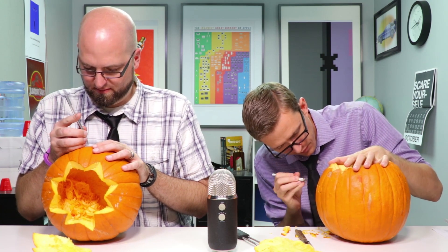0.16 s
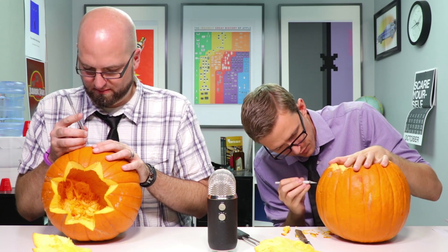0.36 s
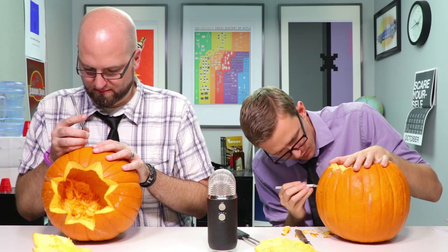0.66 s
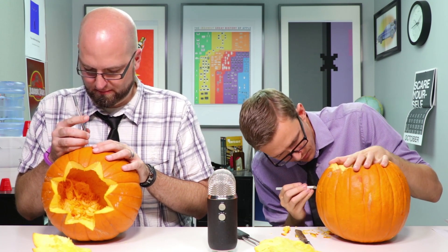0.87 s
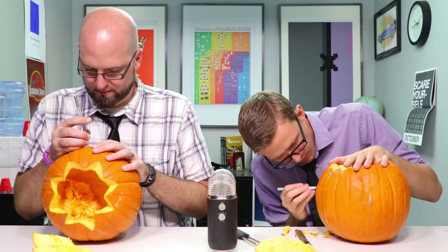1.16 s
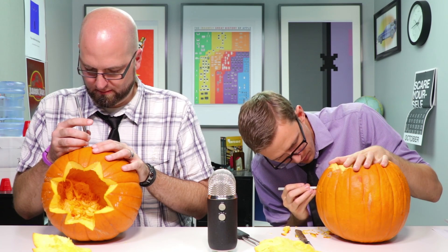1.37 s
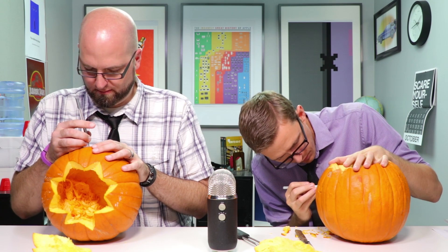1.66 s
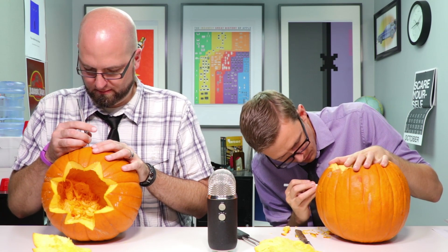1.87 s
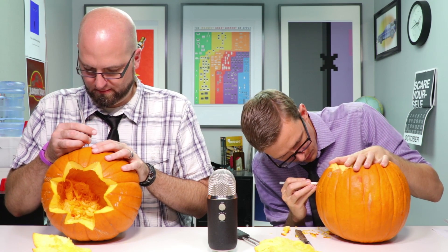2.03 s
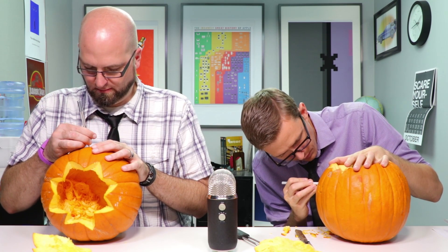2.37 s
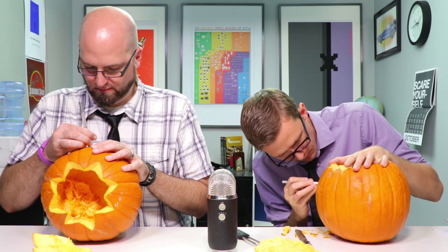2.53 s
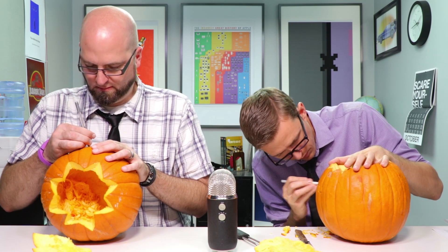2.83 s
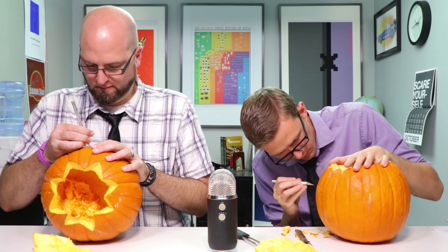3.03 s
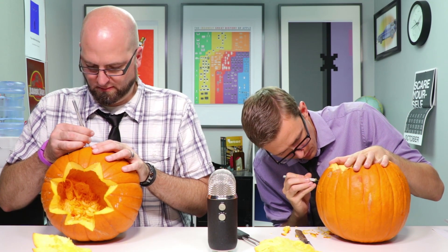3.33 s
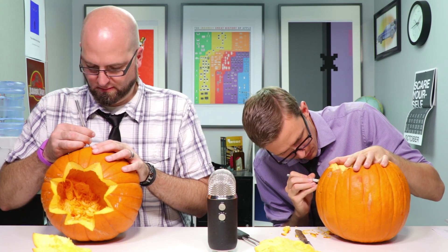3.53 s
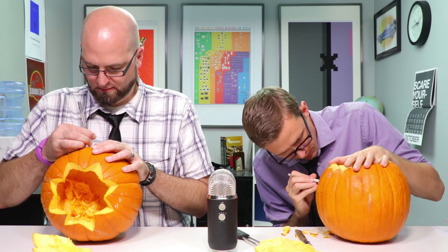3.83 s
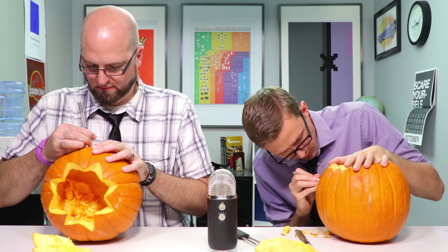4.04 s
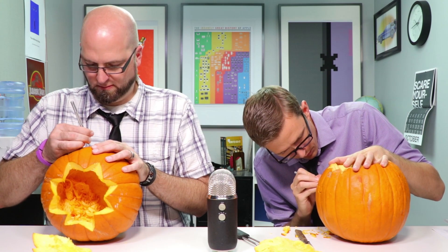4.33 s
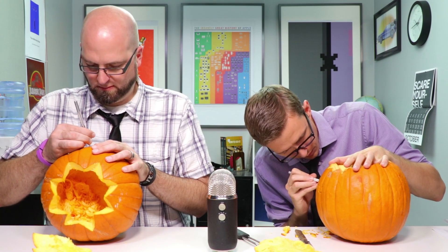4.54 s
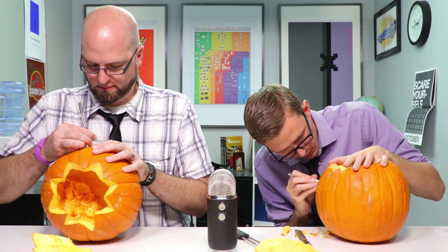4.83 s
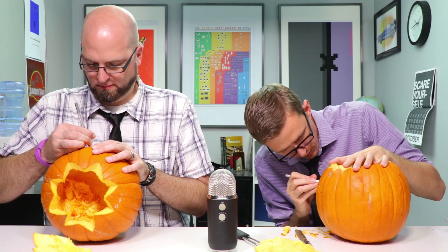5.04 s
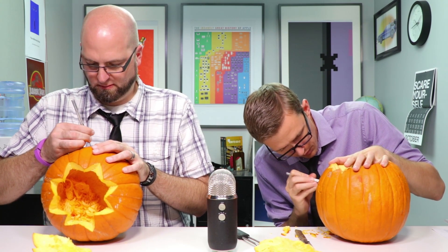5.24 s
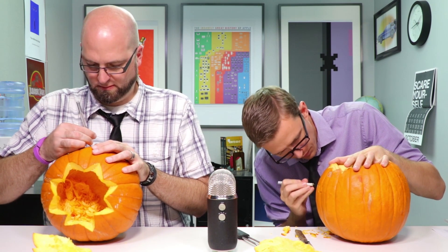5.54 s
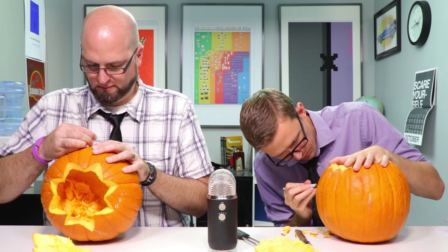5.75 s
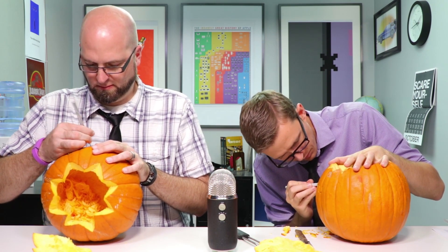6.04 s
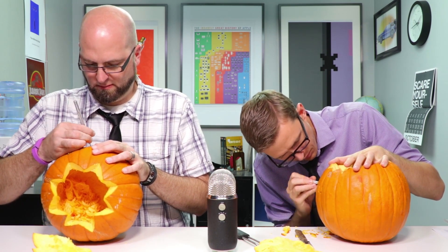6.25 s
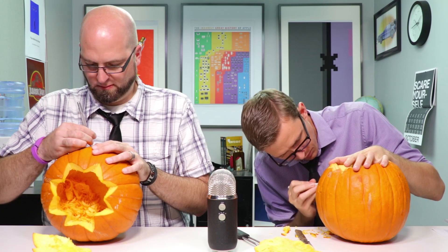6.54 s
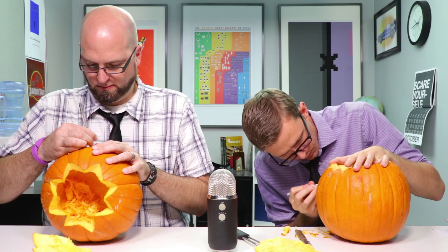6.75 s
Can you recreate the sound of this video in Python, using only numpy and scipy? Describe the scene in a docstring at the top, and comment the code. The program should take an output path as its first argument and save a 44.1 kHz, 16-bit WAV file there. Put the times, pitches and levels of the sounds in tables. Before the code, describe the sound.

Close on a table microphone, a blade scrapes and ticks through hollow pumpkin rind, with dull knocks, soft table bumps and a low room hum.

```python
"""Hollow pumpkins are carved on a table, close to a microphone standing on it, for about seven seconds.
From the start a small furnished room hums and hisses, and hands and blade excite the shell's modes.
From 0.17 s on, pushes jolt the table and the stand. A stiff tool snaps at 0.2 s, as a decaying crack
over ringing modes, then more softly at 1.3, 3.0 and 5.4 s. From about 1 s, torn fibres ring the shell,
rasp and hiss, with a soft breath-like rub at 3.34 s, among knocks (heaviest at 4.05 s) and ticks."""
import sys
import numpy as np
from scipy import signal
from scipy.fft import rfft, irfft
from scipy.io import wavfile
from scipy.ndimage import uniform_filter1d

SR = 44100
rng = np.random.default_rng(int(sys.argv[2]) if len(sys.argv) > 2 else 0)


def waveform_to_disk(signal):
    """Save audio, clipped to [-1, 1], as 16-bit WAV at the path in sys.argv[1]."""
    frames = np.transpose(np.atleast_2d(signal))
    scaled = np.clip(frames, -1, 1) * 32767
    samples = np.round(scaled).astype(np.int16)
    wavfile.write(sys.argv[1], SR, samples)


N = 303764  # samples

# blade strokes through rind, and at 3.34 s a soft long breath-like rub: (time [s],
# nominal length [ms], lower shell modes [dB], upper shell modes [dB], blade hiss [dB])
STROKE_LEVELS = [(0, 46, -97, -76.5, -80), (0.117, 26, -85, -67, -80.5), (0.953, 34, -64, -86, -88),
                 (1.3, 16, -63, -87, -88), (1.405, 13, -55, -76, -82), (1.46, 178, -70, -70.5, -84.5),
                 (1.559, 132, -60, -68.5, -79), (1.74, 55, -72, -73, -80.5), (1.843, 30, -63, -68.5, -85),
                 (2.008, 32, -64, -75.5, -83), (2.292, 48, -55.5, -63, -76), (2.438, 17, -61.5, -65.5, -86),
                 (2.679, 20, -63.5, -71.5, -86), (2.807, 43, -57.5, -57, -71), (2.914, 16, -57.5, -71, -94),
                 (3.151, 26, -81, -83, -80.5), (3.228, 16, -65, -80, -94), (3.34, 220, -85, -78, -93),
                 (3.739, 31, -65, -78, -78), (3.85, 25, -66, -65, -78), (3.908, 21, -61, -77, -84),
                 (4.036, 27.6, -50, -74, -79), (4.17, 115, -62, -76, -77.5), (4.293, 39, -59, -72.5, -75),
                 (4.376, 31, -68, -74, -81.5), (4.644, 58, -60.5, -71, -80.5), (4.773, 42, -62, -67, -78),
                 (4.821, 19, -76, -62.5, -78), (4.896, 16.4, -52.5, -71, -76),
                 (4.944, 9.7, -62, -59.5, -89), (5.086, 38, -60.5, -68, -83), (5.216, 38, -70, -74, -74.5),
                 (5.262, 6.7, -68, -62.5, -80), (5.394, 52, -71, -73, -81),
                 (5.521, 26, -58.5, -75.5, -78.5), (5.717, 20, -55, -68.5, -80),
                 (5.895, 27.6, -59, -68.5, -77.5), (6.169, 64, -73, -82, -79), (6.361, 32, -58.5, -72, -82),
                 (6.425, 123, -59.5, -65, -75.5), (6.671, 39, -60.5, -78.5, -83),
                 (6.82, 23, -53.5, -66.5, -75.5)]
# hands rubbing and working the shells, joined by straight lines: (time [s], level [dB])
HAND_LEVELS = [(0.0, -73), (0.19, -61.5), (0.38, -76), (1.2, -79), (1.549, -64.5), (1.9, -73), (2.6, -79),
               (3.0, -67), (3.25, -75), (3.45, -72.5), (3.9, -72), (4.24, -61.5), (4.4, -84), (4.8, -68),
               (5.001, -100), (5.5, -61.5), (5.6, -75), (6.89, -79)]
# blows of blade or finger on a shell: (time [s], blow level [dB], favoured mode frequency [Hz])
SHELL_KNOCKS = [(0.198, -47.5, 294), (0.393, -59.5, 382), (0.819, -63, 398), (1.412, -63, 170),
                (1.857, -45, 170), (2.02, -60, 183), (2.321, -47, 464), (2.445, -47.5, 268),
                (2.578, -56.5, 301), (2.687, -54, 186), (2.82, -42, 216), (2.919, -47.5, 215),
                (3.11, -54, 167), (3.23, -61.5, 375), (3.723, -55, 380), (3.757, -49.5, 384),
                (3.856, -54.5, 400), (4.051, -36, 135), (4.66, -52, 171), (4.783, -55.5, 387),
                (4.907, -49.5, 447), (4.951, -47, 302), (5.064, -49.5, 224), (5.223, -56, 370),
                (5.266, -54.5, 370), (5.438, -48, 218), (5.688, -56.5, 214), (5.903, -49.5, 486),
                (6.171, -56, 420), (6.221, -51, 169), (6.366, -62, 443), (6.435, -49.5, 243),
                (6.608, -59.5, 435), (6.691, -63, 173), (6.828, -47, 172)]
# blade catching in the rind: (time [s], level before decay [dB], pitch [Hz])
CATCHES = [(1.407, -79, 3080), (1.474, -71, 8500), (2.02, -75, 3200), (2.327, -66, 3320),
           (2.446, -62.5, 1490), (2.688, -73.5, 2770), (2.815, -72, 3020), (2.832, -68, 3560),
           (2.844, -70, 1780), (2.921, -74, 1880), (3.855, -67, 3020), (4.044, -67.5, 2970),
           (4.174, -68, 10500), (4.3, -70, 2980), (4.661, -74, 1500), (4.895, -70, 2960),
           (4.951, -64, 1600), (5.222, -63.5, 2580), (5.266, -64.5, 2950), (5.399, -65.5, 9300),
           (5.694, -66, 1200), (5.729, -64, 2660), (5.899, -69.5, 3020), (6.172, -69, 2900),
           (6.613, -79, 1500), (6.832, -62.5, 2950)]
# snaps of the stiff tool: (time [s], strike level [dB], low modes' strike against it [dB])
TOOL_SNAPS = [(0.2019, -33.5, -17), (1.306, -68, -22), (3.017, -44.5, -18), (5.438, -43.5, -15.5)]
# single pushes on the table, before the stand's response: (time of peak [s], depth [dB])
TABLE_JOLTS = [(0.165, -41.5), (0.234, -33.5), (0.327, -35), (0.552, -32.5), (1.184, -42.5), (1.34, -36),
               (1.6, -38), (1.826, -35), (1.875, -40.5), (2.024, -32.5), (2.402, -40.5), (2.46, -31.5),
               (2.589, -33), (3.026, -38), (3.204, -32), (3.273, -30.5), (3.332, -36), (3.69, -32),
               (3.842, -36.5), (4.074, -33), (4.104, -34.5), (4.288, -31.5), (4.395, -36), (4.639, -30.5),
               (4.855, -34), (4.935, -33), (4.987, -33.5), (5.085, -34), (5.124, -31.5), (5.16, -32.5),
               (5.267, -33.5), (5.303, -37), (5.431, -40.5), (5.53, -32.5), (5.568, -34.5), (5.685, -35),
               (5.989, -30.5), (6.202, -32.5), (6.227, -33.5), (6.303, -32.5), (6.596, -35), (6.704, -32.5),
               (6.882, -32.5)]
# sawing bouts with runs of quick pushes: (start time [s], end time [s], middle depth [dB])
SAWING_BOUTS = [(0.253, .36, -40), (2.349, 2.44, -36), (2.709, 2.89, -40), (2.978, 3.19, -40.5),
                (3.857, 3.9, -35), (4.036, 4.16, -37), (4.313, 4.37, -37), (4.405, 4.46, -35.5),
                (4.672, 4.97, -44), (5.226, 5.65, -38), (5.893, 5.98, -37.5), (6.238, 6.38, -36),
                (6.824, 6.87, -33.5)]
# modes of the hollow shell when no hand damps it: (frequency [Hz], gain [dB], t60 [s])
SHELL_MODES = [(97.3, -3, 0.16), (184.4, 0.5, 0.052), (288, -4, 0.097), (372.6, -2, 0.078), (442, 0, 0.055),
               (542.6, -0.5, 0.051), (753, -5.5, 0.029), (902.5, -12, 0.055), (958.5, -15, 0.083),
               (1160, -14.5, 0.034), (1423, -17.5, 0.017), (1700, -31.5, 0.037)]
# resonances of rasping rind, for one of two passes: (frequency [Hz], width [Hz], gain [dB])
RASP_PEAKS = [(1930, 860, -4), (2400, 2800, -12.5), (3050, 1020, -3)]
# resonances of the hissing blade, for one of two passes: (frequency [Hz], width [Hz], gain [dB])
BLADE_PEAKS = [(6170, 550, -4.5), (7430, 3000, 1), (9320, 3300, 0.1), (10880, 1500, 1), (13900, 3900, 3.5)]
# the blade's brightest ring, moving as it bends and sinks: (time [s], frequency [Hz])
BLADE_FOCUS_PATH = [(0, 10500), (1.45, 8500), (1.68, 8350), (1.8, 10400), (2.83, 9500), (4.2, 10000),
                    (5.0, 7550), (5.4, 9500), (6.5, 10640), (6.85, 7500)]
# modes of the snapping tool: (frequency [Hz], gain [dB], t60 [s])
TOOL_MODES = [(5200, -7, .007), (5600, 0, .008), (6100, -4, .007), (6960, -5, .017), (8200, -18, .005),
              (10800, -17, .01), (12200, -20, .006), (14700, -13, .008), (15200, -12, .012),
              (3900, -16, .006)]
# lower modes of its handle: (frequency [Hz], gain [dB], t60 [s])
HANDLE_MODES = [(1516, 3, 0.014), (1475, -9, 0.03), (1656, -2.5, 0.0057), (2340, -5.5, .045),
                (2464, -5.5, 0.022), (3020, -15.5, 0.0087), (1037, -14.5, 0.03)]
# appliance hum: (frequency [Hz], rms frequency wander [Hz], middle rms level [dB])
HUM_TONES = [(51.7, 2, -63), (119, 3, -70.5), (184.4, 7.5, -79), (398, 8.1, -86.5)]
# air and microphone hiss spectrum, relative to AIR_TOP_DB: (frequency [Hz], density [dB per Hz])
AIR_SPECTRUM = [(8.8, -26), (15, 0), (31, -10), (66, -20.5), (91, -14), (129, -14), (237, -39.5),
                (536, -38), (878, -44), (1240, -41.5), (1570, -45), (5810, -45), (10400, -44), (15600, -45)]

FIBRE_SPREAD_DB = 1.36  # mean of the random extra level of a torn fibre
RASP_DB, RASP_DB_PER_S = 2.5, -36  # rasp against hiss: long strokes glide and so rasp less
HANDS_UPPER_DB = -10  # drive of the upper shell modes by the hands
SKIN_HZ, SKIN_WIDTH_HZ, SKIN_DB = 1695, 1500, -18.5  # palms rustle on the rind; width of one pass
CONTACT_S = 0.0012  # how long a knock presses on the shell
CRACK_DB = -13  # crack against the tool's strike
SNAP_ECHO_S, SNAP_ECHO_DB = 0.0035, -27
SNAP_ROOM_DB = -2  # the tool snaps near the microphone, so less of it comes via the walls
JOLT_MS, BOUT_MS = 12.54, 9.05  # widths of the pushes at half depth
BOUT_GAP_S, BOUT_SPREAD_DB = 0.035, 2.5  # median gap and depth spread of the pushes in a bout
SWAY_HZ, SWAY_Q, SWAY_DB = 6.83, 2.58, -55.5  # stand resonance; rms level of its constant sway
ROOM_T60_S, ROOM_TREBLE_T60_S, ROOM_DB = 0.26, 0.15, -8.5
AIR_TOP_DB = -79.5  # density at 0 dB in the air spectrum [dB per Hz]
TOP_HZ = 15750  # recorder's upper limit


def undb(db):
    """Logarithmic level: decibels to amplitude gain."""
    return 10 ** (np.asarray(db) / 20)


def unit(x):
    """Normalisation: scale to rms 1."""
    return x / np.sqrt(np.mean(x ** 2))


def ring(x, modes):
    """Modal superposition: x strikes damped two-pole resonators of alternating sign."""
    out = 0
    for k, (hz, db, t60) in enumerate(modes):
        radius = np.exp(-np.log(1000) / (t60 * SR))
        w = 2 * np.pi * hz / SR
        gain = (-1) ** k * undb(db) * np.sin(w)
        out = out + signal.lfilter([gain], [1, -2 * radius * np.cos(w), radius ** 2], x)
    return out


def bands(x, peaks):
    """Broad resonance: parallel band-pass peaks, each with a centre, a width and a gain."""
    return sum(undb(db) * signal.lfilter(*signal.iirpeak(hz, hz / width, fs=SR), x)
               for hz, width, db in peaks)


def bands_twice(x, peaks):
    """Cascaded resonance: a second pass steepens the skirts and repeats the gains."""
    return bands(bands(x, peaks), peaks)


def add(track, s, piece):
    """Linear superposition: mix a piece into a track at s seconds."""
    i = max(int(s * SR), 0)
    track[i:i + len(piece)] += piece[:N - i]


def walk(rate):
    """Slow fluctuation: random values of about unit rms, held 1 / rate s and smoothed twice."""
    k = int(SR / rate)
    held = np.repeat(rng.standard_normal(N // k + 1), k)
    return 1.38 * uniform_filter1d(uniform_filter1d(held, k), k)[:N]


def fibres(rate):
    """Random impulse process: fibres tear as tiny clicks, rate per second, some larger than others."""
    torn = rng.random(N) < rate / SR
    return torn * rng.standard_normal(N) * undb(FIBRE_SPREAD_DB * rng.exponential(size=N))


def strokes():
    """Forced resonance: fine random clicks and rubbing hands drive the shell, rind, palms and blade."""
    low_force, upper_force, rasp_force, hiss_force = force = np.zeros((4, N))
    for s, ms, low_db, upper_db, hiss_db in STROKE_LEVELS:
        # the tapered stroke outlasts its nominal length and starts a little early
        shape = signal.windows.tukey(int(1.444 * ms * SR / 1000), .8)
        rasp_db = hiss_db + RASP_DB + RASP_DB_PER_S * ms / 1000
        for track, db in zip(force, (low_db, upper_db, rasp_db, hiss_db)):
            add(track, s - ms / 4000, undb(db) * shape)
    force *= undb(1.9 * walk(70))  # the blade sticks and slips
    hand_db = np.interp(np.arange(N) / SR, *np.transpose(HAND_LEVELS))
    hands = undb(hand_db) * rng.standard_normal(N)
    tear = unit(fibres(1200))

    # a hand on the shell damps the modes under a stroke
    damped = [(hz, db, 0.6 * t60) for hz, db, t60 in SHELL_MODES]
    low_modes, upper_modes = damped[:6], damped[6:]
    low_drive = low_force * tear + hands
    upper_drive = upper_force * tear + undb(HANDS_UPPER_DB) * hands
    # each group is scaled by its response to steady tearing
    shell = ring(low_drive, low_modes) / np.std(ring(tear, low_modes))
    shell = shell + ring(upper_drive, upper_modes) / np.std(ring(tear, upper_modes))

    rasp = unit(bands_twice(fibres(3500), RASP_PEAKS))
    skin = [(SKIN_HZ, SKIN_WIDTH_HZ, 0)]
    rustle = undb(SKIN_DB) * bands_twice(hands, skin) / np.std(bands_twice(tear, skin))
    return shell + rustle + rasp_force * rasp + hiss_force * blade_hiss()


def blade_hiss():
    """Filtered impulse noise: fine tearing in broad blade resonances, weighted by a moving focus."""
    fine = fibres(8000)
    focus = np.interp(np.arange(N) / SR, *np.transpose(BLADE_FOCUS_PATH))
    hiss = 0
    for peak in BLADE_PEAKS:
        octaves_off = np.log2(peak[0] / focus)
        hiss = hiss + undb(-35 * octaves_off ** 2) * bands_twice(fine, [peak])
    return unit(hiss)


def ticks():
    """Transient narrow-band noise: a few rough, decaying cycles where the blade catches."""
    out, t = np.zeros(N), np.arange(500) / SR
    envelope = np.exp(-t / 0.0051) * np.clip(t / .0004, 0, 1)
    for (s, db, hz), grit in zip(CATCHES, rng.standard_normal((len(CATCHES), 500))):
        catch = [(hz, 0.6 * hz, 0)]
        add(out, s, undb(db) * unit(bands_twice(grit, catch)) * envelope)
    return out


def knocks():
    """Impact excitation: a short push rings the shell; the struck spot favours some modes."""
    out = np.zeros(N)
    blow = np.hanning(int(SR * CONTACT_S) + 3)
    blow = np.pad(blow / blow.sum(), (0, 8000))  # time to ring
    for s, db, top_hz in SHELL_KNOCKS:
        spot = [(hz, mode_db - 7 * np.log2(hz / top_hz) ** 2, t60) for hz, mode_db, t60 in SHELL_MODES]
        add(out, s, undb(db) * ring(blow, spot))
    return out


def snaps():
    """Impulse response: a crack rings tool and rattling handle; the table reflects a faint echo."""
    strike, handle, crack = np.zeros((3, N))
    t = np.arange(600) / SR
    for (s, db, low_db), grit in zip(TOOL_SNAPS, rng.standard_normal((len(TOOL_SNAPS), 600))):
        add(strike, s, undb([db]))
        add(handle, s, undb([db + low_db]))
        add(handle, s, undb(db + low_db - 16) * grit * np.exp(-t / 0.01))  # rattle
        add(crack, s, undb(db + CRACK_DB) * grit * np.exp(-t / 0.0021))
    snap = 1.15 * ring(strike, TOOL_MODES) + ring(handle, HANDLE_MODES) + crack
    return snap + undb(SNAP_ECHO_DB) * np.roll(snap, int(SNAP_ECHO_S * SR))


def table():
    """Damped oscillator: pushes dent the pressure at the microphone; the stand swings back slowly."""
    sway = undb(SWAY_DB) * unit(bands(rng.standard_normal(N), [(SWAY_HZ, 3., 0)]))
    pushes = [(s, db, JOLT_MS) for s, db in TABLE_JOLTS]
    chances = rng.standard_normal((len(SAWING_BOUTS), 2, 30))
    for (start, end, db), (gap_chance, depth_chance) in zip(SAWING_BOUTS, chances):
        gaps = BOUT_GAP_S * np.exp(.3 * gap_chance)
        times = start + np.cumsum(gaps) - BOUT_GAP_S / 2
        pushes += [(s, db + BOUT_SPREAD_DB * c, BOUT_MS) for s, c in zip(times, depth_chance) if s < end]
    push = np.zeros(N)
    for s, db, ms in pushes:
        t = np.arange(-1.5 * ms, 1.5 * ms, 1000 / SR)  # ms from the peak
        dent = np.exp(-4 * np.log(2) * (t / ms) ** 2)
        add(push, s - 1.5 * ms / 1000, -undb(db) * dent)
    # resonant second-order high-pass
    w = 2 * np.pi * SWAY_HZ
    stand = signal.bilinear([1, 0, 0], [1, w / SWAY_Q, w ** 2], SR)
    return sway + signal.lfilter(*stand, push)


def room(x, near):
    """Reverberation: direct sound, then a dense tail; soft furnishings absorb the treble first."""
    t = np.arange(int(.4 * SR)) / SR
    noise = rng.standard_normal(len(t))
    low = signal.lfilter(*signal.butter(2, 3500, fs=SR), noise)
    tail = low * undb(-60 * t / ROOM_T60_S) + (noise - low) * undb(-60 * t / ROOM_TREBLE_T60_S)
    tail *= np.clip(t / 0.0069 - .4, 0, 1)  # the first walls answer after a few ms
    tail /= np.sqrt(np.sum(tail ** 2))
    sent = x + undb(SNAP_ROOM_DB) * near
    return x + near + undb(ROOM_DB) * signal.fftconvolve(sent, tail)[:N]


def background():
    """Stationary noise and modulated tones: steady air and microphone hiss under wavering hum."""
    hz, db = np.transpose(AIR_SPECTRUM)
    f = np.maximum(np.arange(N // 2 + 1) * SR / N, 1)
    white = np.sqrt(SR / 2) * rng.standard_normal(N)  # 0 dB per Hz
    air_db = AIR_TOP_DB + np.interp(np.log(f), np.log(hz), db)
    air = irfft(rfft(white) * undb(air_db), N)
    t = np.arange(N) / SR
    hum = 0
    for hz, width, db in HUM_TONES:
        level = undb(db + walk(6.5))
        cycles = hz * t + np.cumsum(width * walk(9)) / SR
        hum = hum + level * np.sqrt(2) * np.sin(2 * np.pi * cycles)
    return air + hum


def scene():
    """Superposition: all sources sum at one microphone."""
    carving = strokes() + knocks() + ticks()
    return (room(carving, snaps()) + table() + background())[None]


def record(dry):
    """Band limiting: the recorder cuts the top with a steep elliptic low-pass."""
    return signal.sosfilt(signal.ellip(10, .2, 60, TOP_HZ, fs=SR, output="sos"), dry)


dry = scene()
out = record(dry)
waveform_to_disk(out)
```